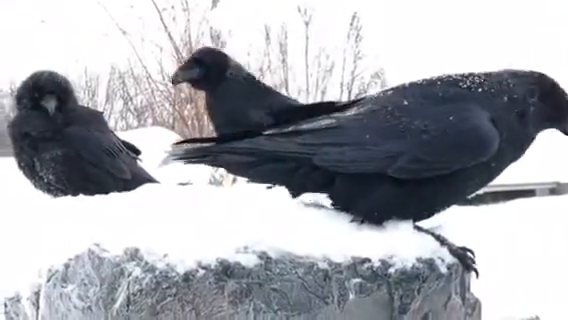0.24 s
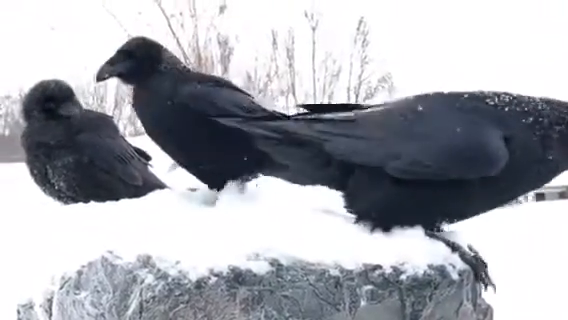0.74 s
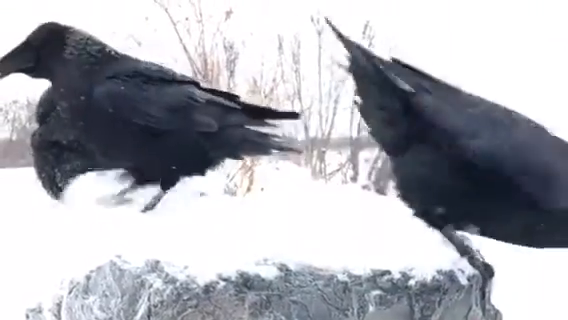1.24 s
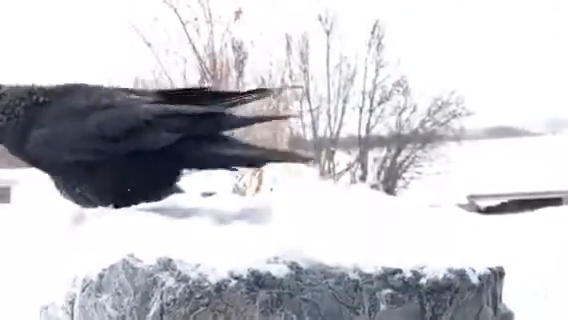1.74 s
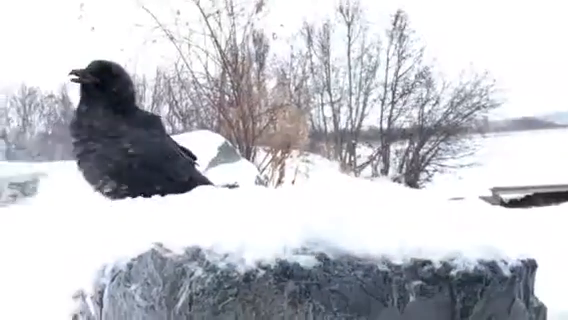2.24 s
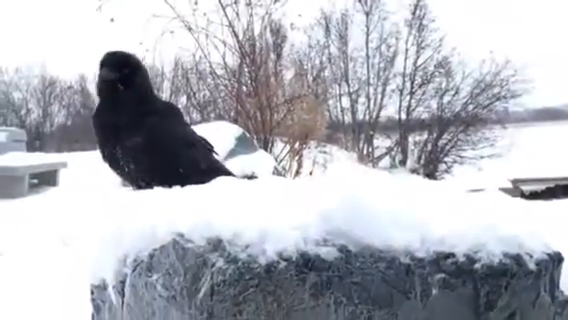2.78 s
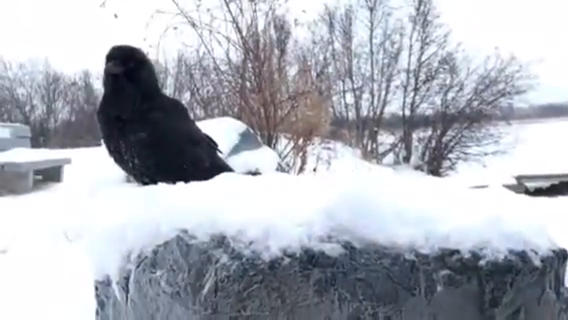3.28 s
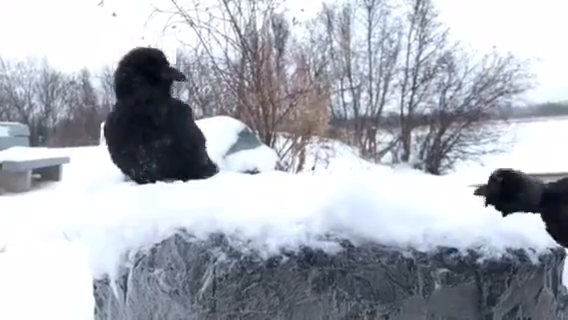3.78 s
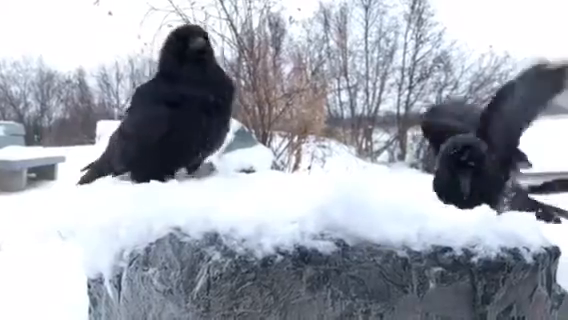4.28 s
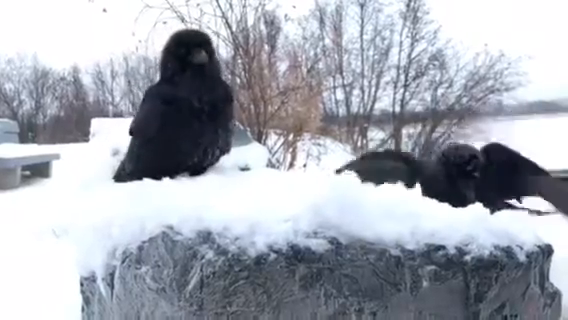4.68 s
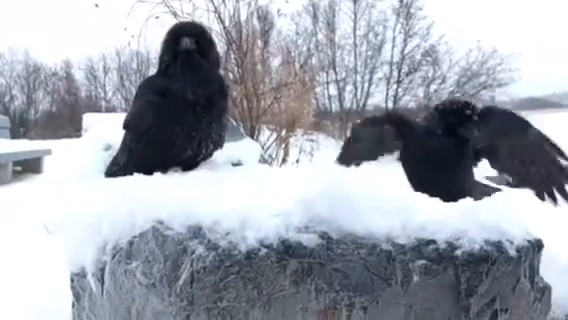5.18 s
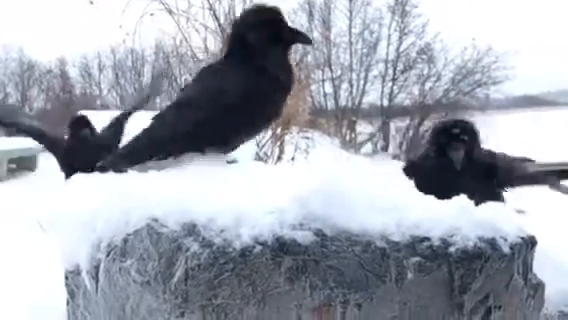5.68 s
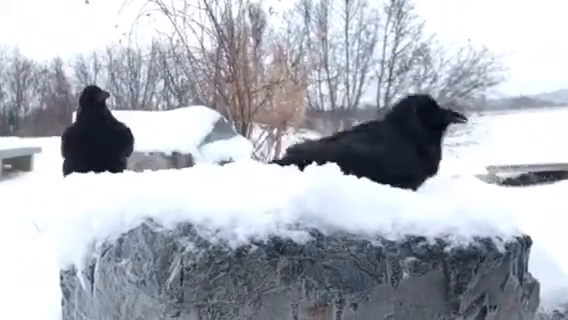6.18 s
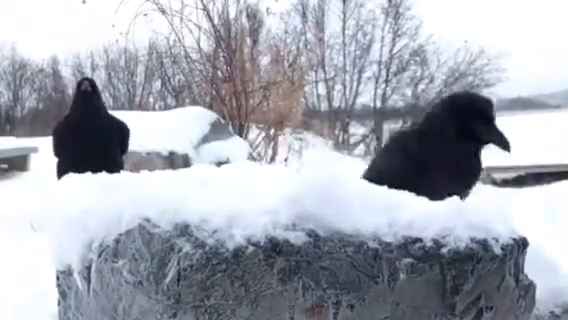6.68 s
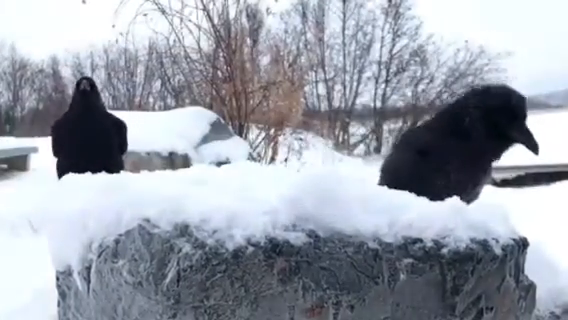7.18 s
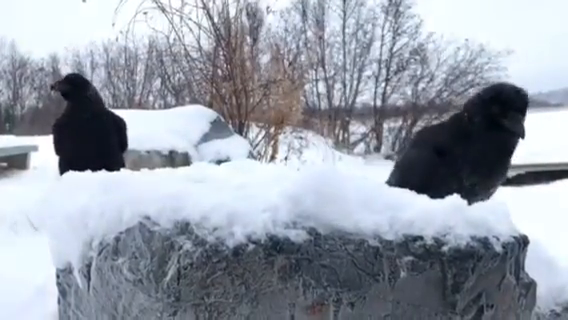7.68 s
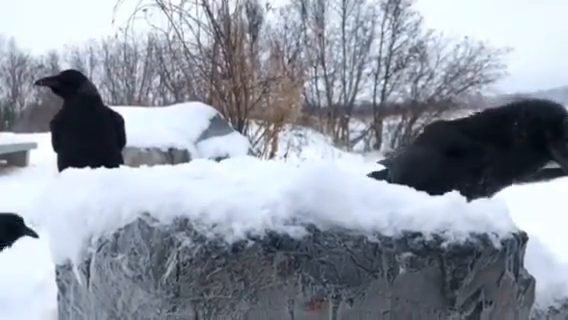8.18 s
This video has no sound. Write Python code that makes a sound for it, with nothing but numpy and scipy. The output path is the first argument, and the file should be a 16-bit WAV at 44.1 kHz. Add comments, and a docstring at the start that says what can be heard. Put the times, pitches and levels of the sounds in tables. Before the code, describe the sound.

Ravens close to the microphone on a snowy stone outdoors. Faint wind-like rush, low rumble and a distant puttering engine run throughout. Soft steps crunch in snow and feathers rustle, then a loud, raspy, breaking squawk; more crisp crunches and wing puffs follow, then three separate whining calls that rise quickly, quiver and drop at the end. Afterwards only small shuffles and quiet air remain.

```python
"""A steady outdoor rush comes first, with rumble and a faint, distant engine: shaped noise and wavering drones.
Feathers rustle, feet crunch in snow and wings push the air: noise in short bell-shaped swells.
Ravens then squabble: one harsh squawk, then three arched, whining calls, each a sum of harmonics shaped by
throat and beak. In the first whine the other side of the syrinx joins in on a pitch of its own."""
import sys
import numpy as np
from scipy import signal
from scipy.fft import rfft, irfft, next_fast_len
from scipy.io import wavfile
from scipy.ndimage import uniform_filter1d, map_coordinates

SR = 44100
rng = np.random.default_rng(int(sys.argv[2]) if len(sys.argv) > 2 else 0)


def dump(signal):
    """Clip the signal to [-1, 1] and save it as 16-bit WAV at the path in sys.argv[1]."""
    limited = np.clip(np.atleast_2d(signal).T, -1, 1)
    pcm = np.round(limited * 32767).astype(np.int16)
    wavfile.write(sys.argv[1], SR, pcm)


N = 371763

# Second side of the syrinx. Each row: time in seconds, pitch in Hz, common level of its tones in dB.
SECOND_SIDE = [(2.635, 1131, -61), (2.653, 1171, -19.5), (2.68, 1199, -19.5), (2.72, 1184, -20.5),
               (2.755, 1156, -23.5), (2.775, 1150, -41)]


def amp(db):
    """Decibels are logarithmic: converts them to an amplitude gain."""
    return 10 ** (np.asarray(db) / 20)


def unit(x):
    """Normalization of power: scales to rms 1."""
    return x / np.sqrt(np.mean(x ** 2) + 1e-20)


def along(points, hz):
    """Log-frequency interpolation: reads (Hz, value) points at the frequencies hz."""
    f, v = np.transpose(points)
    return np.interp(np.log(hz + 1), np.log(f + 1), v)


def curves(rows, t):
    """Linear interpolation in time: each column after the first, at the times t."""
    s, *columns = np.transpose(rows)
    return [np.interp(t, s, column) for column in columns]


def wobble(t, rate):
    """Band-limited fluctuation: a smooth random curve with rate knots a second."""
    knot = (t - t[0]) * rate
    return map_coordinates(rng.standard_normal(int(knot[-1]) + 4), [knot + 1])


def filtered(x, response):
    """Linear filtering: multiplies the spectrum of x by a response of frequency."""
    size = next_fast_len(N + 8192)
    return irfft(rfft(x, size) * response(np.fft.rfftfreq(size, 1 / SR)), size)[:N]


def noise(spectrum):
    """Spectral shaping: white noise coloured by (Hz, relative dB) points, at rms 1."""
    return unit(filtered(rng.standard_normal(N), lambda hz: amp(along(spectrum, hz))))


def bump(t, s, length):
    """Gaussian envelope: a swell around the time s, down to exp(-2) one length away."""
    return np.exp(-2 * ((t - s) / length) ** 2)


def span(start, end):
    """Sampling in time: the instants from start to end in seconds."""
    return np.arange(int(start * SR), int(end * SR)) / SR


def placed(t, x):
    """Superposition in time: sets a short sound into silence at its times."""
    return np.pad(x, (round(t[0] * SR), N))[:N]


def far_engine(t, chug_db=-64):
    """Periodic modulation: the third and fourth orders of an engine cycle beat into an uneven putter."""
    # Wavering drones. Each row: centre in Hz, waver rate in knots per second, gain in dB.
    drones = [(90, 9.6, -60), (143.3, 8, -59.5)]
    # Ring of the engine. Each row: frequency in Hz, relative noise density in dB.
    ring = [(600, -33), (820, -9.5), (915, 0.5), (1020, -29), (1200, -14.5), (1550, -9.5), (1900, -13),
            (2600, -31), (5000, -47)]
    cycle = 2 * np.pi * 5.83 * t + .1 * wobble(t, 2)
    putter = amp(5.5 * np.cos(3 * cycle) + 4.5 * np.cos(4 * cycle))
    hum = 0
    for hz, rate, db in drones:
        in_phase = wobble(t, rate) * np.cos(2 * np.pi * hz * t)
        quadrature = wobble(t, rate) * np.sin(2 * np.pi * hz * t)
        hum = hum + amp(db) * (in_phase + quadrature)
    return hum + amp(chug_db) * unit(putter * noise(ring))


def outdoors(t, air_db=-59, rumble_db=-51.5):
    """Stationary noise: a gently fluctuating far rush and rumble surround the engine."""
    # Spectra of rush and rumble. Each row: frequency in Hz, relative noise density in dB.
    rush_spectrum = [(180, -34.5), (300, -16.5), (400, -15.5), (660, -12.5), (790, -18.5), (900, -3),
                     (1150, -7.5), (1390, -9.5), (1530, -4.5), (1910, -12), (2400, -8.5), (2790, -19),
                     (3340, -14.5), (4880, -19), (5850, -18), (15500, -30.5)]
    rumble_spectrum = [(12, -36.5), (20, -8), (64, -3.5), (96, -2.5), (123, -6.5), (150, -4), (236, -21.5),
                       (271, -19), (400, -34), (520, -74), (880, -120)]
    air = amp(air_db + 0.41 * wobble(t, 12)) * noise(rush_spectrum)
    rumble = amp(rumble_db + 0.73 * wobble(t, 13)) * noise(rumble_spectrum)
    return air + rumble + far_engine(t)


def echo(x):
    """Diffuse reverberation: trees over soft snow answer with exponentially decaying noise."""
    # Decay of the echo. Each row: frequency in Hz, time to fall by 60 dB in seconds.
    decay = [(300, 0.36), (2000, 0.36), (10000, .2)]
    hz, t, z = signal.stft(rng.standard_normal(SR // 2), SR, nperseg=256)
    fading = z * amp(-60 * t / along(decay, hz)[:, None])
    tail = signal.istft(fading, SR, nperseg=256)[1]
    return signal.fftconvolve(x, tail / np.linalg.norm(tail))[:N]


def movements(t, trim_db=-2, fidget_db=-75, grain_db=3):
    """Friction and displaced air: snow crunches in fine grains, feathers brush and wings push the air."""
    # Steps in the snow. Each row: start in seconds, level in dB, length of the decay in seconds.
    footfalls = [(1.039, -54, .041), (1.344, -52.5, .015), (1.799, -42, .059), (1.901, -45.5, .006),
                 (2.117, -37.5, .0043), (2.138, -41, .039), (2.291, -38, .006), (2.344, -44, .0074),
                 (2.445, -35.5, .007), (3.713, -52, .02), (3.823, -40, .016), (3.875, -49, .02),
                 (4.687, -51.5, .02), (5.469, -53, .013), (5.568, -52, .015), (6.029, -50, .025),
                 (6.468, -51, .0067), (6.582, -48, .026), (6.8, -48.5, .022), (6.828, -47, .012),
                 (7.017, -50.5, .02)]
    # Shifting birds, then wings and bodies pushing the air.
    # Each row: centre in seconds, level in dB before trim_db, half-length in seconds.
    shuffles = [(1.0, -59, .16), (1.5, -57, .12), (1.95, -52.5, .2), (2.34, -49, .22), (2.66, -51, .12),
                (3.3, -64, .3), (3.78, -59, .2), (4.0, -65, .08), (4.22, -57, .07), (4.4, -62, .15),
                (4.7, -63, .12), (4.96, -58, .05), (5.33, -56, .15), (5.62, -59, .09), (6.1, -53, .09),
                (6.32, -54, .1), (6.75, -57, .33), (7.83, -60, .03)]
    wing_beats = [(1.18, -52, .016), (2.18, -46, .06), (2.287, -40.5, .092), (2.457, -41, .045),
                  (2.624, -45, .05), (4.741, -48.5, .055), (5.559, -45.5, .036), (6.12, -51.5, .06),
                  (6.596, -50, .04), (6.842, -49, .077)]
    # Spectra of snow and feathers, and of pushed air. Each row: frequency in Hz, relative noise density in dB.
    snow_spectrum = [(200, -26), (600, -6.5), (2000, -5.5), (3800, -3.5), (7000, -4.5), (11000, -7),
                     (15500, -7)]
    puff_spectrum = [(25, -10), (70, -8.5), (130, 1.5), (230, -7.5), (450, -16), (1000, -18.5), (1800, -19),
                     (3000, -33)]

    crunch = unit(noise(snow_spectrum) * amp(grain_db * wobble(t, 900) + 1.2 * wobble(t, 160)))
    steps = 0
    for start, db, length in footfalls:
        peak = start + length / 5
        # the rise is steeper than the decay
        steps = steps + amp(db) * bump(t, peak, np.where(t < peak, length * .75, length))

    # the feathers are never quite still
    stir = amp(fidget_db) + sum(amp(db) * bump(t, s, length) for s, db, length in shuffles)
    rustle = stir * amp(trim_db + 1.8 * wobble(t, 30) + 2.2 * wobble(t, 400))
    puffs = sum(amp(db + trim_db) * bump(t, s, length) for s, db, length in wing_beats)
    return steps * crunch + rustle * noise(snow_spectrum) + puffs * noise(puff_spectrum)


def arch(start, end, mid_hz, glide, scoop, rise, fall, steepness):
    """Membrane tension sets pitch: a call's times, scooping and dropping pitch, drop and beak closing (0-1)."""
    drop_share = .44  # of the pitch, lost by the end
    close_lead_s, close_s = .092, .028  # the beak closes shortly before the end
    t = span(start, end)
    age, left = t - t[0], t[-1] - t
    drop = np.exp(-(left / fall) ** steepness)
    line = mid_hz + glide * (age - left) / 2
    pitch = line * (1 - scoop * np.exp(-age / rise)) * (1 - drop_share * drop)
    closed = (1 + np.tanh((close_lead_s - left) / close_s)) / 2
    return t, pitch, drop, closed


def swell(t, attack_s, release_s=.008):
    """Exponential build-up and decay: attack, hold and release of a sound."""
    return (1 - np.exp((t[0] - t) / attack_s)) * (1 - np.exp((t - t[-1]) / release_s))


def bloom(t, late_db=28, bloom_s=.006, flare_db=3, flare_s=.026):
    """Delayed overtone onset: dB by which upper harmonics set in after the lowest two, then briefly flare."""
    flare = flare_db * bump(t, t[0] + flare_s, flare_s * .6)
    return flare - late_db * np.exp(-(t - t[0]) / bloom_s)


def harmonics(t, levels, beak, hz, phase, flutter, fray, unrest_db, core=1, count=20):
    """Source and filter: the syrinx gives harmonics, throat and beak weight them; core scales the second."""
    # Windpipe, colouring the lowest two harmonics. Each row: frequency in Hz, gain in dB.
    windpipe = [(500, -20), (750, -10.5), (880, -2), (980, 0), (1150, 1), (1400, 6.5), (1600, 3), (1750, 3),
                (1850, -1), (1960, -3.5)]
    first_db, second_db, upper_db = levels
    k = np.arange(1, count + 1)[:, None]

    # as the beak and tongue move, each upper harmonic swells and flutters in its own way
    drift = np.array([wobble(t, 18) + wobble(t, 130) for _ in k[2:]])
    upper = amp(along(beak, k[2:] * hz) + unrest_db * drift)
    typical = np.median(np.linalg.norm(upper, axis=0))
    upper *= amp(upper_db + flutter * np.minimum((k[2:] - 2) / 2, 2)) / typical
    first = amp(first_db + along(windpipe, hz))
    second = amp(second_db + along(windpipe, 2 * hz)) * core
    gains = np.vstack([first, second, upper])

    # turbulence frays each harmonic into a band, the high ones most
    grit = np.array([wobble(t, 600) + 1j * wobble(t, 600) for _ in k]) / np.sqrt(2)
    share = np.clip(fray * np.maximum((k - 1.5) / 2.5, .15), 0, .95)
    lag = rng.uniform(0, 2 * np.pi, k.shape)
    lines = (np.sqrt(1 - share ** 2) + share * grit) * np.exp(1j * (k * phase - lag))
    return np.sqrt(2) * np.sum(gains * lines.real, axis=0)


def squawk(fray=.36, break_fray=1.8, rasp_db=-10, breath=.6, sag=.12, close_db=16,
           second_swell_db=4, second_drop_db=21):
    """Unstable oscillation: at each break pitch sags, the second harmonic dips, phase slips and noise spits."""
    # Arch of the call: start and end in seconds, mid pitch in Hz, glide in Hz per second,
    # scoop as a share of pitch, rise and fall in seconds, fall steepness.
    shape = (1.557, 1.781, 797, -130, .17, .04, .031, 1.9)
    # Base levels of fundamental, second harmonic and upper harmonics in dB.
    first_db, second_db, upper_db = (-10, -6, -6)
    # Throat and open beak. Each row: frequency in Hz, relative gain in dB.
    open_beak = [(1500, 6.5), (2000, -8), (2400, -14.5), (2750, -3.5), (3160, -2.5), (3950, -0.5),
                 (4740, -8.5), (5530, -10), (6500, -11), (7200, -20), (7850, -30), (8500, -20),
                 (9600, -23.5), (11070, -28.5), (14230, -35.5)]
    # Stumbles of the vibration. Each row: time in seconds, depth from 0 to 1.
    breaks = [(1.5645, .7), (1.578, .6), (1.6315, .8), (1.6565, .85), (1.681, .75), (1.691, .85),
              (1.7062, .95), (1.7145, .85), (1.7348, .85), (1.746, .75)]
    break_s = .0017
    before_s, before_db = .11, -49.5  # faint noise, coloured like the squawk, swells just before it

    t, pitch, drop, closed = arch(*shape)
    envelope = swell(t, attack_s=.006)
    stumble = np.clip(sum(depth * bump(t, s, 2 * break_s) for s, depth in breaks), 0, 1)
    strain = sum(depth * bump(t, s, 4 * break_s) for s, depth in breaks)
    slips = 0
    for s, _ in breaks:
        slips = slips + rng.uniform(-np.pi, np.pi) / 4 * np.tanh((t - s) / (break_s / 2))

    upper_db = upper_db - close_db * closed + bloom(t)
    levels = first_db, second_db + second_swell_db * closed - second_drop_db * drop, upper_db
    slack = 1 - pitch / pitch.max()
    unsteady = (.012 + .07 * slack) * wobble(t, 260) + .01 * wobble(t, 1100)
    hz = pitch * (1 - sag * (strain - strain.mean()) + unsteady)
    phase = 2 * np.pi * np.cumsum(hz) / SR + slips
    frayed = fray * (1 + break_fray * strain) + slack / 2
    tone = harmonics(t, levels, open_beak, hz, phase, 0.58 * wobble(t, 130), frayed,
                     unrest_db=1.5, core=1 - stumble)

    # one coloured noise serves the rasp and the faint noise before the call
    coloured = noise([(250, -27), (500, -13), (700, -2.5), (1050, -4), (1450, 7), (2100, -16.5), (2600, -14),
                      (3300, -2.5), (4200, -2), (7000, -21.5), (15000, -38.5)])
    before = span(t[0] - before_s, t[0])
    faint = placed(before, amp(before_db) * swell(before, attack_s=.025))
    rasp = placed(t, envelope * amp(upper_db + rasp_db) * (breath + 2.1 * strain))
    call = placed(t, envelope * tone) + (faint + rasp) * coloured
    # a beak is too small to radiate bass
    return filtered(call, lambda hz: amp(along([(150, -30), (300, -5), (520, 0.5)], hz)))


def second_side(t, first_phase, rasp_db=-15):
    """Intermodulation: the other side of the syrinx makes sum and difference tones with the first, and a rasp."""
    # Joint tones. Each row: multiple of the first side's pitch, multiple of the second side's.
    pairs = [(0, 1), (1, 1), (0, 2), (-1, 2), (1, 2), (2, 2), (2, 1), (2, -1)]
    # Level of each joint tone in dB relative to the common level.
    pair_db = [-2, -13.5, -7, -15, -17.5, -20.5, -31, -36.5]
    hz, db = curves(SECOND_SIDE, t)
    phase = 2 * np.pi * np.cumsum(hz * (1 + .004 * wobble(t, 400))) / SR
    tones = 0
    for (a, b), level in zip(pairs, pair_db):
        tones = tones + amp(level) * (1 + .17 * wobble(t, 300)) * np.cos(a * first_phase + b * phase)
    rasp = noise([(600, -40), (1100, -18.5), (1700, -3.5), (2300, 15), (2800, 1), (4200, 6.5),
                  (7000, -1.5), (12000, -38.5)])[:len(t)]
    sounding = (t > SECOND_SIDE[0][0]) & (t < SECOND_SIDE[-1][0])
    return sounding * amp(db) * (np.sqrt(2) * tones + amp(rasp_db) * rasp)


def whine(shape, voice, quiver, beak, jitter=.0032, fray=.125, upper_fade_db=3, close_db=5, two_sided=False):
    """Frequency modulation: a call fades as air runs out, brightest while a fast tremor pulls the pitch down."""
    # Losses of fundamental, second harmonic and upper harmonics in dB: as the pitch drops,
    # then while the second side sounds.
    drop_loss = (22, 8, 17)
    yield_loss = (0, 5, 12)
    t, pitch, drop, closed = arch(*shape)
    first_db, second_db, upper_db, first_fade_db, second_fade_db = voice
    tremor_hz, tremor, flutter_db = quiver

    spent = np.linspace(0, 1, len(t)) ** 2
    first = first_db - first_fade_db * spent
    second = second_db - second_fade_db * spent
    upper = upper_db - upper_fade_db * spent - close_db * closed + bloom(t)
    levels = np.array([first, second, upper]) - np.outer(drop_loss, drop)
    if two_sided:  # the first side loses overtones while the second takes its air
        taken = amp(curves(SECOND_SIDE, t)[1])
        levels = levels - np.outer(yield_loss, (taken / taken.max()) ** 2)

    shake = 2 * np.pi * np.cumsum(tremor_hz * (1 + 0.12 * wobble(t, 28))) / SR
    slack = 1 - pitch / pitch.max()  # at both ends the membranes are slack and vibrate roughly
    unsteady = jitter * wobble(t, 900) + .03 * slack * wobble(t, 250)
    hz = pitch * (1 + tremor * np.sin(shake) + unsteady)
    phase = 2 * np.pi * np.cumsum(hz) / SR
    tone = harmonics(t, levels, beak, hz, phase, -flutter_db * np.cos(shake), fray + 2.6 * slack ** 1.3,
                     unrest_db=1.5)
    tone = swell(t, attack_s=.016) * tone
    if two_sided:
        tone = tone + second_side(t, phase)
    return placed(t, tone)


def scene():
    """Superposition: four calls with their echo, the birds' movements and the open air."""
    # Whining calls. Each row holds three groups.
    # Arch: start and end in seconds, mid pitch in Hz, glide in Hz per second, scoop as a share of pitch,
    # rise and fall in seconds, fall steepness.
    # Voice: initial fundamental, second and upper harmonics in dB, fades of fundamental and second in dB.
    # Quiver: mean tremor rate in Hz, tremor as a share of pitch, flutter of the upper harmonics in dB,
    # scaled by harmonic number.
    whines = [((2.556, 2.891, 942, -220, .23, .043, .025, 1.8), (-14, -26, -28, 9, 1.5), (76, .0099, 1.5)),
              ((4.209, 4.522, 979, -110, .27, .021, .029, 1.15), (-11, -27.5, -29.5, 14.5, -.5),
              (60, .014, 1.9)), ((5.110, 5.339, 921, 400, .25, .0137, .029, 1.25),
              (-11.2, -19.5, -24.5, 6.5, 5), (63.9, .015, 1.06))]
    # Throat and beak of each whine. Each row: frequency in Hz, relative gain in dB.
    beak_a = [(2780, -0.5), (3710, -8.5), (4630, -12.5), (5560, -10.5), (6490, -16.5), (7410, -24),
              (8340, -30.5), (9270, -32), (10190, -39), (12050, -37), (14830, -38)]
    beak_b = [(2200, 2), (2650, -8.5), (2930, 2.5), (3250, -14.5), (3600, -2.5), (3900, -10), (4450, -7.5),
              (4900, -16.5), (5300, -10), (5850, -20.5), (6700, -19.5), (7750, -29), (8720, -32.5),
              (10660, -45), (12590, -40), (15500, -50)]
    beak_c = [(2000, -5), (2350, 5.5), (2570, 9.5), (2670, -8.5), (2780, -9), (3050, -3), (3350, -2.5),
              (3650, -7.5), (4150, -9.5), (4550, 0.5), (4950, -9), (5440, -13), (5900, -5.5), (6400, -13.5),
              (7250, -13), (8000, -30), (9070, -23), (9970, -49), (11790, -36), (14510, -42)]
    t = np.arange(N) / SR
    calls = squawk()
    for i, (row, beak) in enumerate(zip(whines, (beak_a, beak_b, beak_c))):
        calls = calls + whine(*row, beak, two_sided=i == 0)
    return (calls + amp(-40.5) * echo(calls) + movements(t) + outdoors(t))[None]


def gain_control(x, knee_db=-22, squeeze=.5, recover_db_per_s=16):
    """Compression: level above the knee turns the gain down at once by a share squeeze; it creeps back."""
    level_db = 10 * np.log10(np.abs(uniform_filter1d(x ** 2, size=512)) + 1e-12)
    recovered = recover_db_per_s * np.arange(N) / SR
    wanted_db = squeeze * np.maximum(level_db - knee_db, 0)
    # the running maximum holds each cut while the recovery ramp releases it
    cut_db = np.maximum.accumulate(wanted_db + recovered) - recovered
    return x * amp(-cut_db)


def record(dry):
    """Saturation and band limiting: the recorder rides its gain, rounds the highest peaks and cuts the top."""
    top_hz = 15900
    x = gain_control(dry[0])
    rounded = x / (1 + np.abs(x / .76) ** 8) ** (1 / 8)
    return filtered(rounded, lambda hz: hz < top_hz)[None]


dry = scene()
out = record(dry)
dump(out)
```